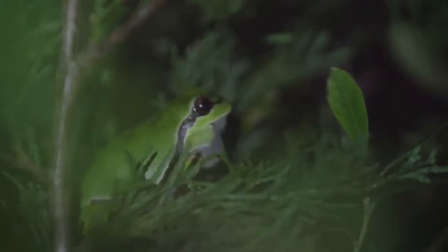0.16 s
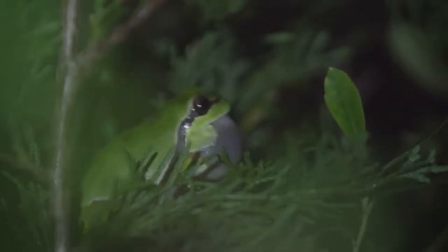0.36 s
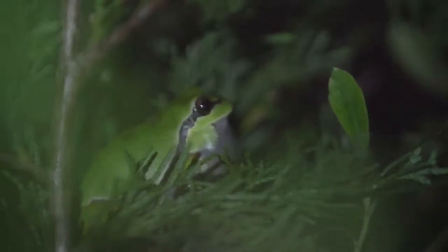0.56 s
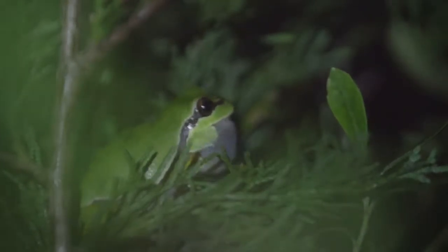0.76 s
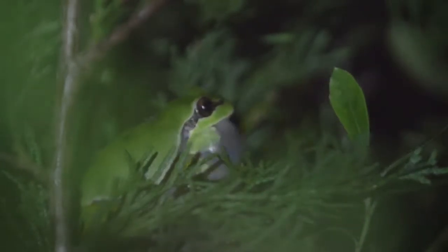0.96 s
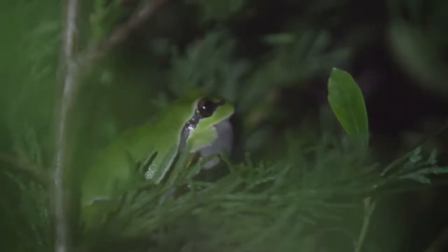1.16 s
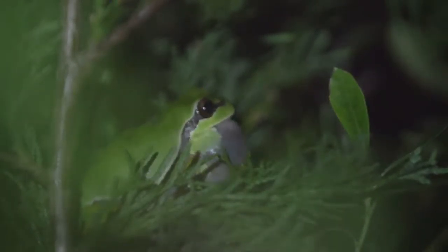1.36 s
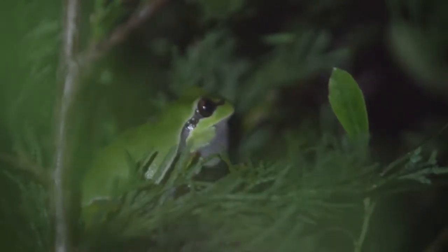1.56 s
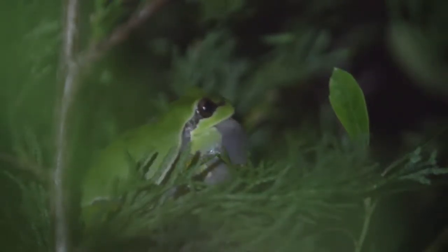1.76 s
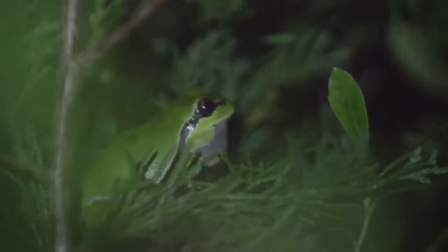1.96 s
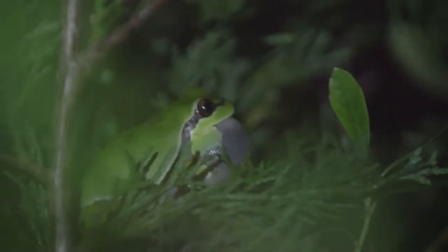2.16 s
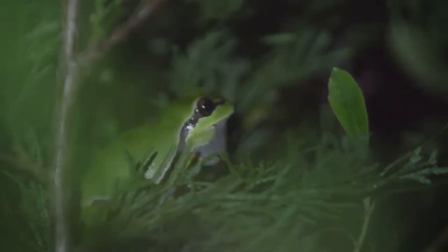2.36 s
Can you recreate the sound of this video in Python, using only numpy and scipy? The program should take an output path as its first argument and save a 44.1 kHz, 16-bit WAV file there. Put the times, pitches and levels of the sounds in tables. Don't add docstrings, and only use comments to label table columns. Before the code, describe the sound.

A treefrog close by honks harshly again and again over steady night crickets and insects

```python
import sys
import numpy as np
from scipy import signal
from scipy.fft import rfft, irfft
from scipy.io import wavfile
from scipy.ndimage import uniform_filter1d

SR = 44100
rng = np.random.default_rng(int(sys.argv[2]) if len(sys.argv) > 2 else 0)


def wrap_up_sound(samples):
    columns = np.atleast_2d(samples).T
    tamed = np.clip(columns, -1, 1)
    steps = np.round(tamed * 32767).astype(np.int16)
    wavfile.write(sys.argv[1], SR, steps)


def natural_amplitude(level_db):
    exponent = np.asarray(level_db, float) / 20
    return 10 ** exponent


N = 110250

# start [s], length [s], slip after start [s], unsettled time [s], fold pitch [Hz].
CALLS = [
    (-.180, .115, .078, .002, 1128),
    (.202, .113, .087, .060, 1134),
    (.574, .115, .078, .002, 1128),
    (.959, .113, .078, .002, 1127),
    (1.334, .115, .077, .002, 1127),
    (1.723, .113, .076, .016, 1131),
    (2.110, .119, .086, .060, 1134),
]
# time [s], pitch ratio.
PITCH_GLIDE = [(0, .925), (.017, .93), (.024, .97), (.040, .988), (.060, .997), (.085, 1.004), (.14, 1.008)]
# time from release [s], pitch ratio.
CLOSING_PITCH = [(-.010, 1.0), (-.001, 1.02), (.004, 1.0), (.009, .975), (.014, .915)]
# time [s], level in dB.
OPENING_EFFORT = [(-.008, -45), (0, -28), (.009, -11), (.02, -5), (.035, -0.5)]
# time from release [s], level in dB.
RELEASE_LEVEL = [(-.006, 0), (.002, -1), (.006, -8), (.011, -8.5), (.016, -20.5), (.026, -56)]
# fold multiple, beat multiple, level at start, late in third-lock, in fourth-lock [dB].
COMBINATION_TONES = [(1, 0, -17.5, -23, -22), (1, 1, -14.5, -27.5, -23.5), (1, 2, -23.5, -36, -36.5),
                     (2, -1, -83, -64, -31.5), (2, 0, -31, -14, -22.5), (2, 1, -32, -32.5, -21),
                     (2, 2, -46.5, -34, -37.5), (3, -1, -84.5, -69.5, -39), (3, 0, -49, -42, -54),
                     (3, 1, -50.5, -48.5, -51), (3, 2, -69.5, -50.5, -47.5), (1, -1, -45.5, -58.5, -50)]
# left minus right in third-lock, in fourth-lock [dB],
# left lead in third-lock, in fourth-lock [rad].
TONE_SIDES = [(0, -2, -0.34, 0.042), (2, 2.5, 0.43, .55), (9, 7.5, -1, 1.6), (-3.5, -11, -1.2, -2.4),
              (-5.5, -3.5, -0.94, -1), (-11, -0.5, -0.069, 0.62), (3, -11, .7, .05), (7.5, 3.5, 0.7, 1.8),
              (1, 5, .3, 0), (0, 9, -.5, -.1), (0, -6, 1, 1.8), (-0.5, -0.5, .5, .4)]
TONE_SINK = [-6, -120, -61.5, -350, 55, 35, 1.5, -200, -400, -65.5, -400, -4]
# frequency [Hz], level in dB.
UPPER_TONES = [(4300, -56.5), (5100, -65.5), (5900, -58), (6600, -66.5), (8300, -71.5), (9350, -51),
               (10300, -70), (12200, -75.5)]
# time [s], level in dB.
UPPER_SWELL = [(.006, -11.5), (.020, -3.5), (.040, -0.5), (.075, -6.5), (.12, -16)]
# time [s], frequency ratio.
UPPER_ARCH = [(.01, .93), (.045, 1.022), (.075, 0.995), (.12, .93)]
# frequency [Hz], width [Hz], level in dB.
BREATH_HISS = [(1500, 460, 0), (2600, 500, 0), (3900, 1300, -23), (10000, 2200, -25)]
# pitch [Hz], level in dB, left minus right [dB].
CRICKET_VOICES = [(3108, -46.5, 0), (3130, -57.5, 10), (3060, -57, -8)]
# rate [per s], first peak [s].
WING_STROKES = [(37.94, .006), (43, .015), (28, .002)]
# frequency [Hz], width [Hz], level in dB, pulses [per s], first peak [s].
THROBBING_INSECTS = [(7530, 260, -62.5, 51.48, .0133), (9320, 500, -75.5, 35, .003)]
# frequency [Hz], width [Hz], level in dB, left minus right [dB], sings until [s].
FAR_SINGERS = [(1051, 330, -51, 12, 3), (2310, 46, -65, 0, 3), (3170, 250, -55, 5, 3),
               (7564, 650, -60.5, -2.5, 3), (8500, 260, -72.5, -4, 3), (9520, 250, -75.5, 0.5, 3),
               (12300, 500, -72.5, 2.5, 1.0), (13500, 2500, -74, -0.5, 1.0)]
# frequency [Hz], density [dB per Hz].
LOW_AIR_COLOUR = [(24, -99), (40, -35), (175, -12.5), (234, -1.5), (549, -5), (725, -11.5), (1170, -3),
                  (1590, -9.5), (2000, -30), (2600, -53), (4400, -120)]
# frequency [Hz], density [dB per Hz].
HIGH_AIR_COLOUR = [(1500, -35), (1900, -13), (2800, -17), (3700, -29.5), (5200, -29), (7500, -26.5),
                   (11000, -35), (15400, -40.5)]
# frequency [Hz], correlation [-1 to 1].
AIR_LIKENESS = [(60, 1), (200, .98), (380, 0.98), (700, 0.65), (1300, 0.11), (4400, 0.27), (9000, 0.29),
                (14000, 0.85)]

LOCK_S, LOCK_TAKES_S = .015, .008
SLIP_SMOOTH_S, SLIP_EVERY_S = .002, .0085
BEAT_ENTERS_S, BEAT_ENTERS_DB, BEAT_DIES_DB_PER_S = .022, -15, 1600
ECHO_DB, ECHO_T60_S, ECHO_DELAY_S, ECHO_HZ = -33, .34, .03, 2290
BANK_DB, BANK_S, BANK_SPREAD_S = -16.5, .09, .012
NEAR_LEAVES_DB, NEAR_LEAVES_S = -21, .03
LOW_AIR_DB, HIGH_AIR_DB = -37.5, -54.5
DUCK_FROM_DB, DUCK_SHARE, DUCK_BACK_DB_PER_S, DUCK_ATTACK_S = -22.5, .49, 49, .0021
LOW_CUT_HZ = 95


def rms_one(x):
    return x / np.sqrt(np.mean(x ** 2) + 1e-20)


def line(rows, at):
    return np.interp(at, *np.transpose(rows))


def drift(rate_hz, size=N):
    r = np.exp(-2 * np.pi * rate_hz / SR)
    return rms_one(signal.lfilter([1], [1, -2 * r, r * r], rng.standard_normal(size + SR))[SR:])


def resonate(x, hz, width_hz):
    r = np.exp(-np.pi * width_hz / SR)
    poles = [1, -2 * r * np.cos(2 * np.pi * hz / SR), r * r]
    return signal.lfilter([(1 - r * r) / 2, 0, (r * r - 1) / 2], poles, x)


def narrow(x, hz, width_hz, second_width_hz):
    return resonate(resonate(x, hz, width_hz), hz, second_width_hz)


def pan(db):
    return natural_amplitude(np.array([db / 2, -db / 2]))


def combination_tones(t, fold, beat, slip, mix, beat_db, release):
    out = np.zeros((2, len(t)))
    swing = np.clip((t - LOCK_S) / .078, 0, 1) ** .71
    closing = np.clip(1 + release / .006, 0, 1)
    closing_db = {(2, 0): -.5, (1, 0): -2.5}
    for tone, side, sink in zip(np.array(COMBINATION_TONES), TONE_SIDES, TONE_SINK):
        j, k, first, late, low = tone
        pan3, pan4, lead3, lead4 = side
        j, k = round(j), round(k)
        third_db = first + (late - first) * swing
        fourth_db = low + sink * np.clip(t - slip - .01, 0, .03)
        db = third_db * (1 - mix) + fourth_db * mix + beat_db * (k != 0)
        db += closing * closing_db.get((j, k), 0)
        lead = (lead3 + (lead4 - lead3) * mix) / 2
        lag = 1.7 * (k + (1 - j) / 2) * (j > 1)
        out += natural_amplitude(db) * pan(pan3 + (pan4 - pan3) * mix) * np.sin(j * fold + k * beat - lag + [lead, -lead])
    return out


def upper_tones(t, fold, beat, fold_hz, share, fourth, beat_db):
    out = np.zeros((2, len(t)))
    for j in range(4, 11):
        for k in range(-1, 3):
            db = line(UPPER_TONES, fold_hz * (j + k * share) / line(UPPER_ARCH, t))
            db += line(UPPER_SWELL, t) + beat_db
            db += 4 * np.sin(rng.uniform(30, 120) * t + rng.uniform(0, 2 * np.pi))
            turn = rng.uniform(0, 2 * np.pi) + .74 * rng.standard_normal((2, 1))
            out += natural_amplitude(db) * (fourth if k < 0 else 1) * np.sin(j * fold + k * beat + turn)
    return out


def breath(t, beat, length, slip, unsettled, release):
    puff = 0
    for hz, width_hz, db in BREATH_HISS:
        puff = puff + natural_amplitude(db) * rms_one(narrow(rng.standard_normal(len(t)), hz, width_hz, width_hz))
    opening = np.clip(1 - abs(t - .018) / .014, 0, .7)
    closing = np.clip(1 + release / .008, .12, .5)
    slipping = (t > slip) * (t < min(slip + unsettled, length))
    slipping = uniform_filter1d(.45 * slipping, SR // 250)
    loose = np.maximum(np.maximum(opening, closing), slipping)
    return natural_amplitude(-32) * loose * rms_one(puff) * (1 + np.cos(beat))


def honk(length, slip, unsettled, hz):
    size = SR // 5
    t = np.arange(size) / SR - .01
    release = t - length - min(unsettled / 2, .008)
    slips = slip + np.cumsum(np.r_[0, SLIP_EVERY_S * rng.uniform(.7, 1.4, 12)])
    flicker = t - slips[np.maximum(np.searchsorted(slips, t) - 1, 0)] < 4 / hz
    fourth = np.where(t < slip, 0., np.where(t < slip + unsettled, flicker, 1.))
    mix = uniform_filter1d(np.where(t < slip, 0, .4 + .6 * fourth), SR // 250)
    fourth = uniform_filter1d(fourth, int(SLIP_SMOOTH_S * SR))

    strain = .5 * np.clip(t - slip, 0, unsettled)
    fold_hz = hz * line(PITCH_GLIDE, t) * line(CLOSING_PITCH, release)
    fold_hz *= 1 + strain + .0009 * drift(150, size)
    not_yet_locked = np.clip(1 - (t - LOCK_S) / LOCK_TAKES_S, 0, 1)
    share = 1 / 3 - np.maximum(fourth, not_yet_locked) / 12
    fold, beat = 2 * np.pi * np.cumsum([fold_hz, fold_hz * share], axis=1) / SR
    beat_db = -BEAT_DIES_DB_PER_S * np.maximum(t - length + .002, 0)
    beat_db += BEAT_ENTERS_DB * np.clip(1 - t / BEAT_ENTERS_S, 0, 1)

    out = combination_tones(t, fold, beat, slip, mix, beat_db, release)
    out += upper_tones(t, fold, beat, fold_hz, share, fourth, beat_db)
    out += breath(t, beat, length, slip, unsettled, release)
    drive_db = 5
    return np.sqrt(2) * out * natural_amplitude(line(OPENING_EFFORT, t) + line(RELEASE_LEVEL, release) + drive_db)


def leaf_echo():
    t = np.arange(SR // 2) / SR
    tail = resonate(rng.standard_normal((2, len(t))), ECHO_HZ, 1500)
    tail *= natural_amplitude(-60 * t / ECHO_T60_S) * (t > ECHO_DELAY_S)
    tail *= 1 + natural_amplitude(BANK_DB) * np.exp(-((t - BANK_S) / BANK_SPREAD_S) ** 2)
    tail /= np.sqrt(np.sum(tail ** 2) / 2)
    near = rng.standard_normal((2, len(t))) * natural_amplitude(-60 * t / NEAR_LEAVES_S / 2) * (t > .003)
    near /= np.sqrt(np.sum(near ** 2) / 2)
    return natural_amplitude(ECHO_DB) * tail + natural_amplitude(NEAR_LEAVES_DB) * near


def frog():
    out = np.zeros((2, N + SR))
    heard = slice(SR // 2, SR // 2 + N)
    for start, *rest in CALLS:
        call, at = honk(*rest), int((start + .49) * SR)
        out[:, at:at + call.shape[1]] += call
    return out[:, heard] + signal.fftconvolve(out, leaf_echo(), axes=1)[:, heard]


def crickets():
    t, out = np.arange(N) / SR, 0
    for (hz, db, lean_db), (rate, first) in zip(CRICKET_VOICES, WING_STROKES):
        stroke = (rate * (t - first) + .5) % 1 - .5
        turn = 2 * np.pi * np.cumsum(hz * (1 - .093 * stroke + .00676 * drift(46.0))) / SR
        octave = natural_amplitude(-18) * pan(-2.0)[:, None] * np.sin(2 * turn + [[0], [2]])
        tone = np.sin(turn + [[0], [1.5]]) + octave
        level = natural_amplitude(db + 7.5 + 1.9 * drift(9.6)) * np.cos(np.pi * stroke) ** 1.37
        out = out + level * tone * pan(lean_db)[:, None]
    return out


def throbbing_insects():
    t, out = np.arange(N) / SR, 0
    for hz, width_hz, db, rate, first in THROBBING_INSECTS:
        shared, own = rng.standard_normal(N), rng.standard_normal((2, N))
        band = narrow(shared + .4 * own, hz, width_hz, 2 * width_hz)
        pulse = (.5 + .5 * np.cos(2 * np.pi * rate * (t - first))) ** .64
        out = out + natural_amplitude(db + drift(1)) * rms_one(band * pulse) * pan(-2)[:, None]
    return out


def far_singers():
    t, out = np.arange(N) / SR, 0
    for hz, width_hz, db, lean_db, until in FAR_SINGERS:
        shared = rng.standard_normal(N) * (hz > 8000)
        noise = shared + .65 * rng.standard_normal((2, N))
        band = rms_one(narrow(noise, hz, width_hz, 2 * width_hz)) * pan(lean_db)[:, None]
        fade_out = np.clip((until + .04 - t) / .12, 0, 1)
        out = out + natural_amplitude(db + 1.6 * drift(4.4)) * band * fade_out
    return out


def air(spectrum):
    hz = np.maximum(np.arange(N // 2 + 1) * SR / N, 1)

    def read(rows):
        return np.interp(np.log(hz), np.log(np.array(rows)[:, 0]), np.array(rows)[:, 1])

    inside = (hz > spectrum[0][0]) * (hz < spectrum[-1][0])
    mid, side = rfft(rng.standard_normal((2, N))) * natural_amplitude(read(spectrum)) * inside
    alike = np.clip(read(AIR_LIKENESS), -.99, .99)
    both = np.sqrt(1 + alike) * mid + np.sqrt(1 - alike) * side * np.array([[1], [-1]])
    return rms_one(irfft(both, N)) * natural_amplitude(.6 * drift(6))


def scene():
    night_air = natural_amplitude(LOW_AIR_DB) * air(LOW_AIR_COLOUR) + natural_amplitude(HIGH_AIR_DB) * air(HIGH_AIR_COLOUR)
    return frog() + crickets() + throbbing_insects() + far_singers() + night_air


def low_pass(x):
    return signal.sosfilt(signal.butter(12, 15530, fs=SR, output="sos"), x)


def record(dry):
    level = 10 * np.log10(uniform_filter1d(np.mean(dry ** 2, axis=0), SR // 100) + 1e-12)
    climb = DUCK_BACK_DB_PER_S * np.arange(N) / SR
    wanted = DUCK_SHARE * np.maximum(level - DUCK_FROM_DB, 0)
    duck_db = np.maximum.accumulate(wanted + climb) - climb
    r = np.exp(-1 / (DUCK_ATTACK_S * SR))
    ducked = dry * natural_amplitude(-signal.lfilter([1 - r], [1, -r], duck_db))
    low_cut = signal.butter(3, LOW_CUT_HZ, "high", fs=SR, output="sos")
    return low_pass(signal.sosfilt(low_cut, ducked))


dry = scene()
out = record(dry)
wrap_up_sound(out)
```